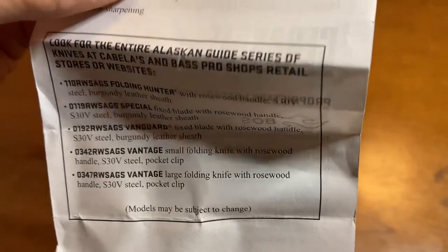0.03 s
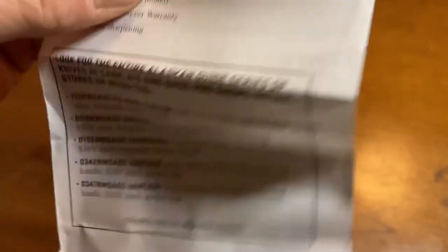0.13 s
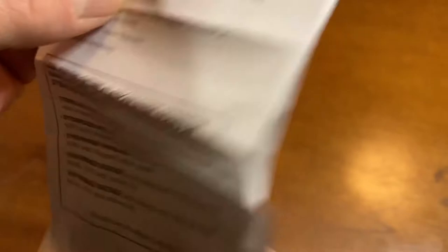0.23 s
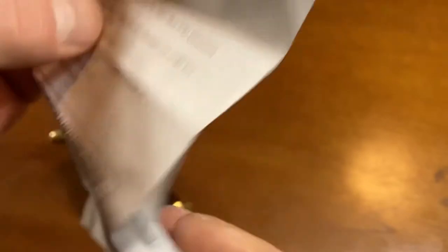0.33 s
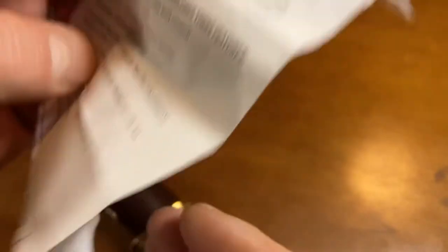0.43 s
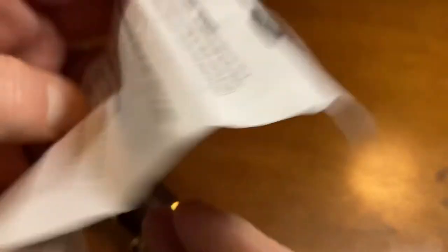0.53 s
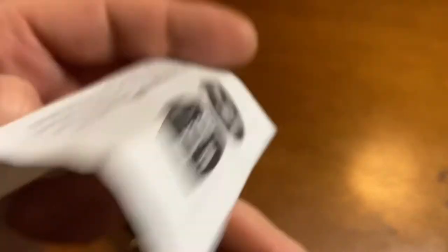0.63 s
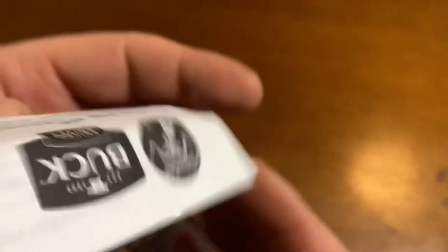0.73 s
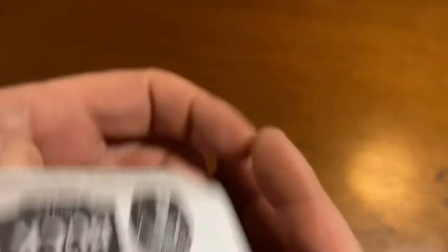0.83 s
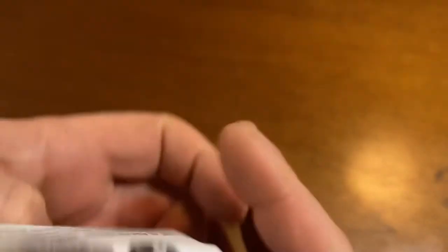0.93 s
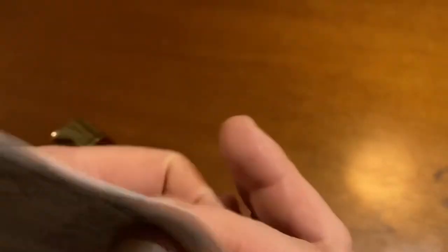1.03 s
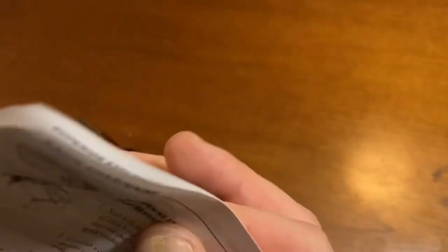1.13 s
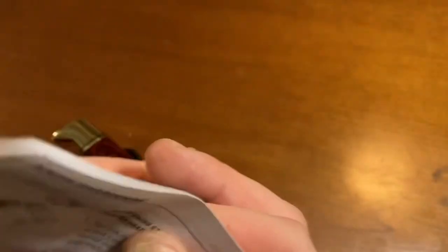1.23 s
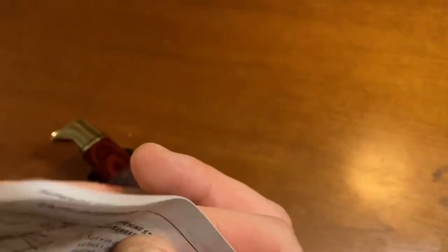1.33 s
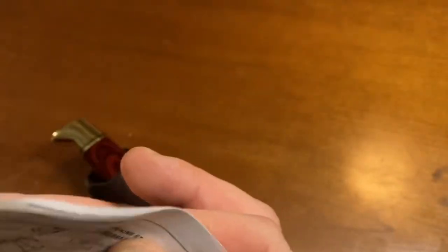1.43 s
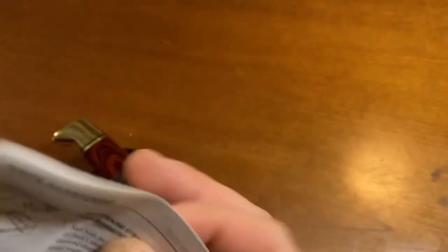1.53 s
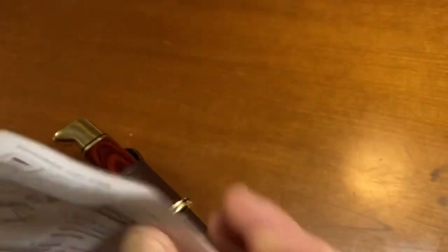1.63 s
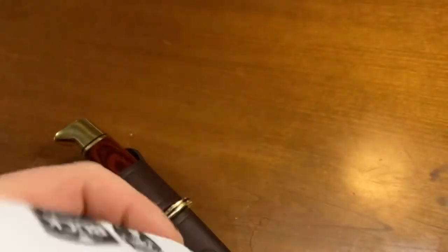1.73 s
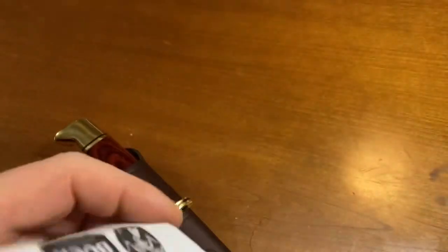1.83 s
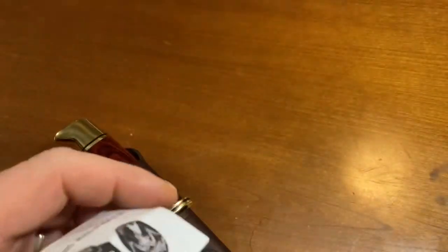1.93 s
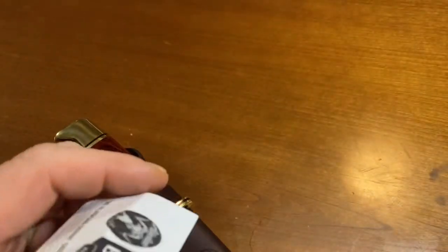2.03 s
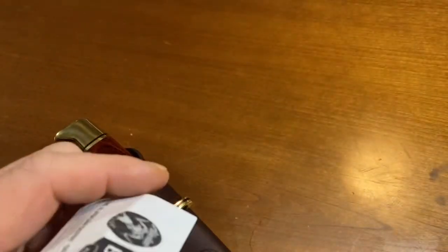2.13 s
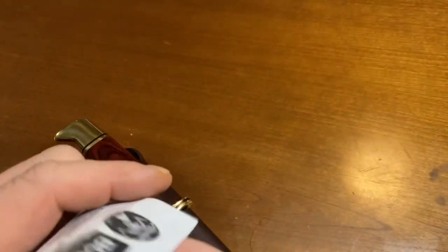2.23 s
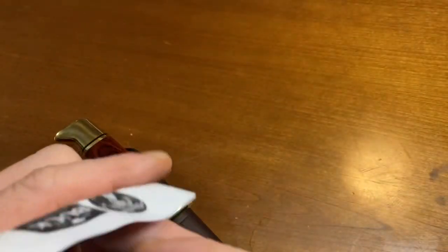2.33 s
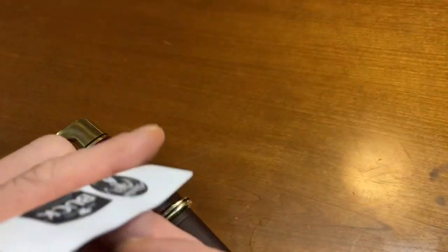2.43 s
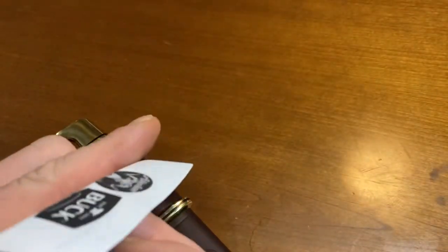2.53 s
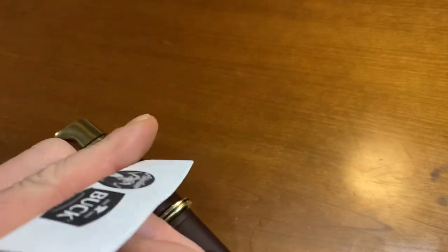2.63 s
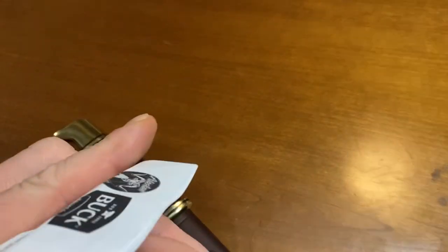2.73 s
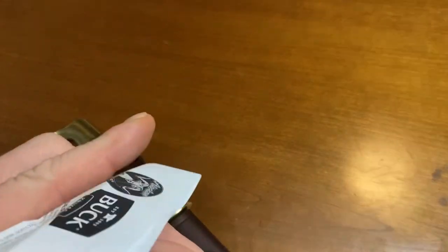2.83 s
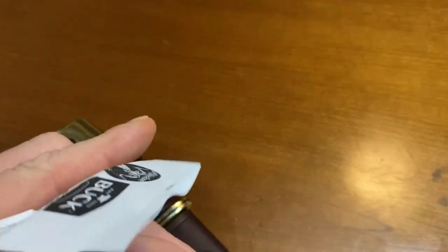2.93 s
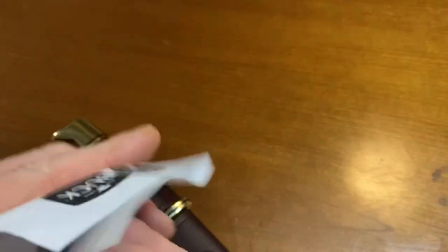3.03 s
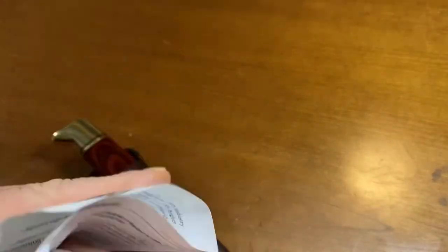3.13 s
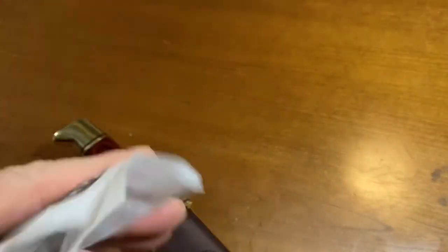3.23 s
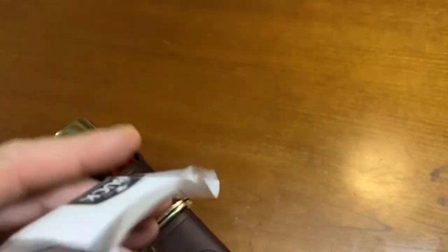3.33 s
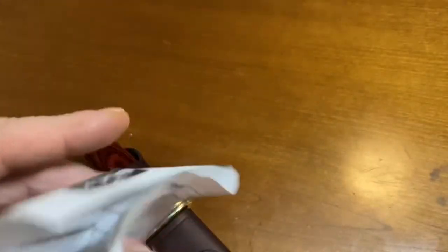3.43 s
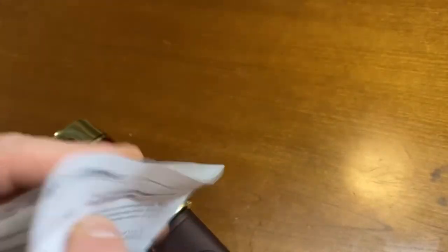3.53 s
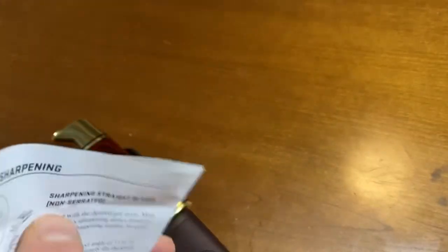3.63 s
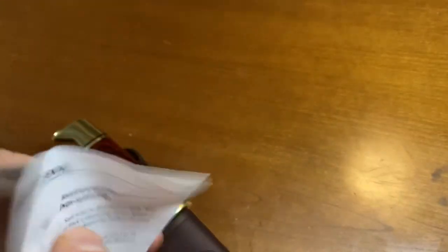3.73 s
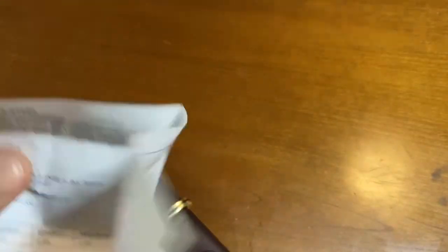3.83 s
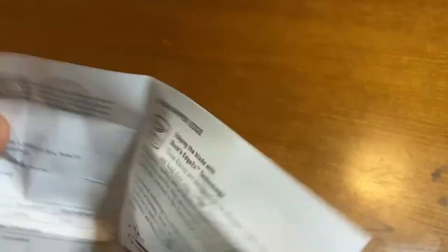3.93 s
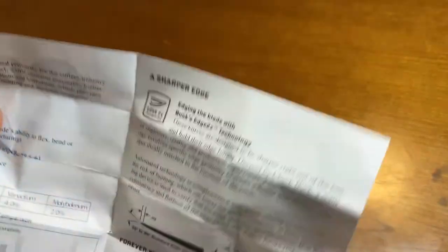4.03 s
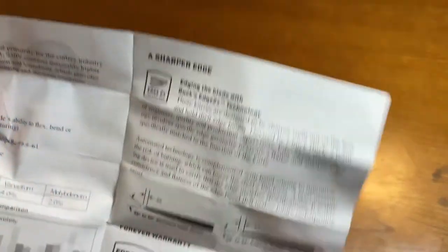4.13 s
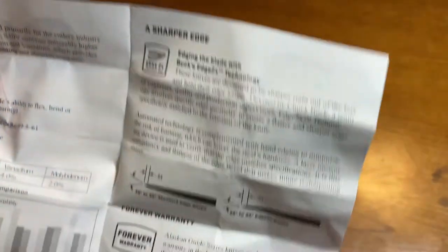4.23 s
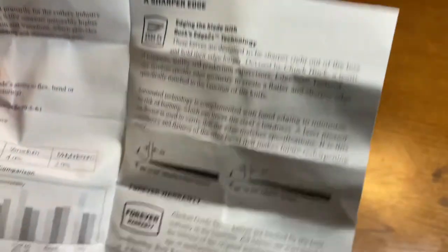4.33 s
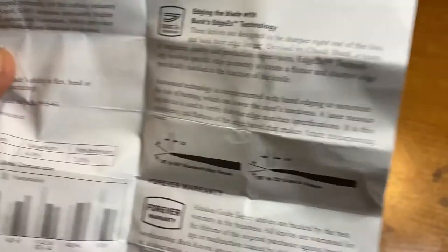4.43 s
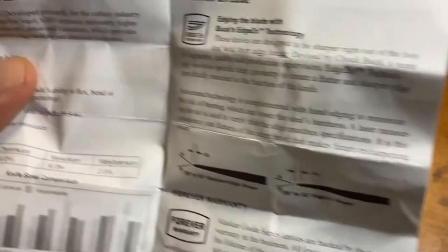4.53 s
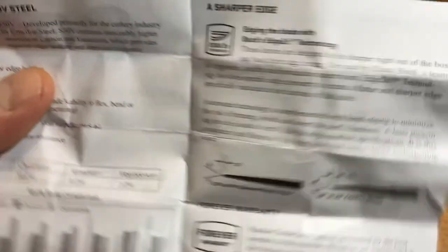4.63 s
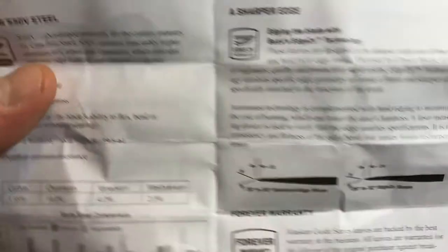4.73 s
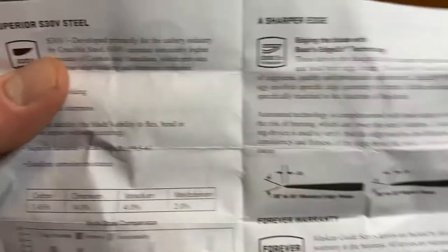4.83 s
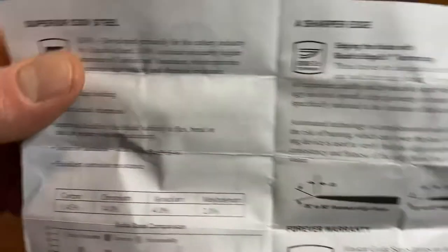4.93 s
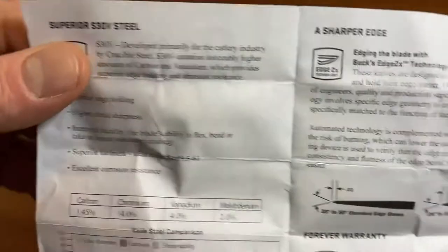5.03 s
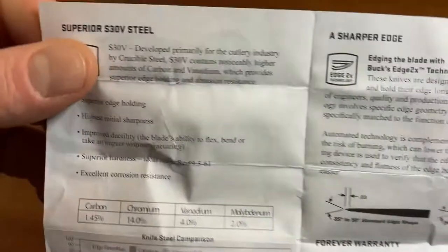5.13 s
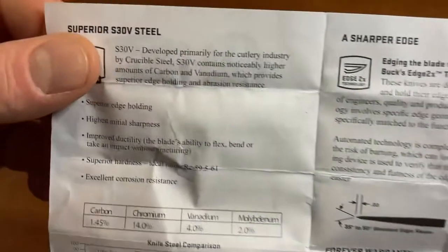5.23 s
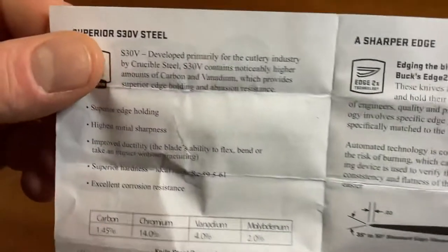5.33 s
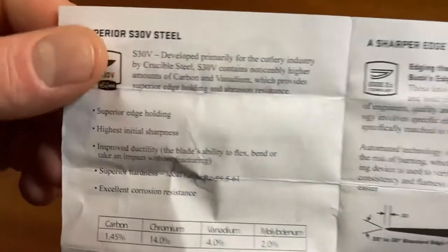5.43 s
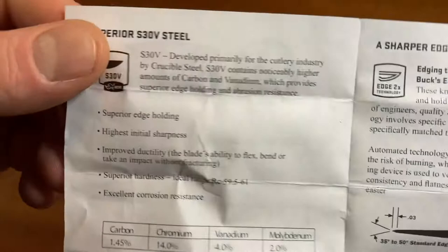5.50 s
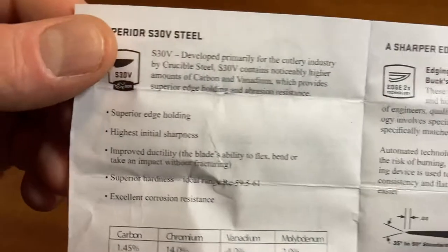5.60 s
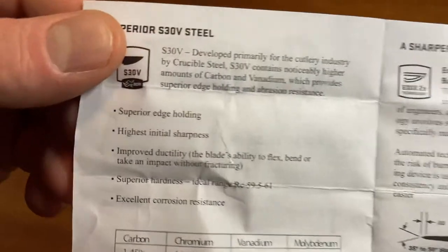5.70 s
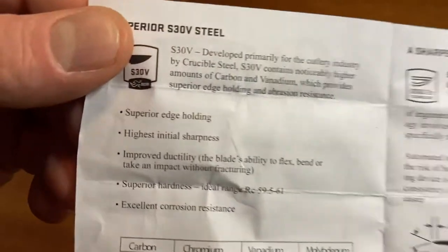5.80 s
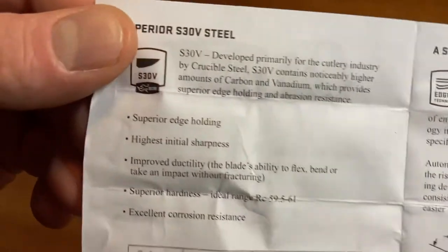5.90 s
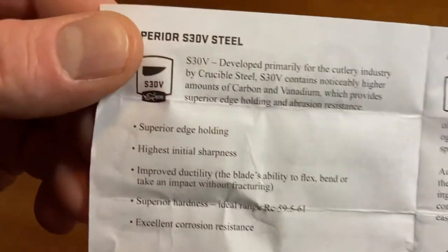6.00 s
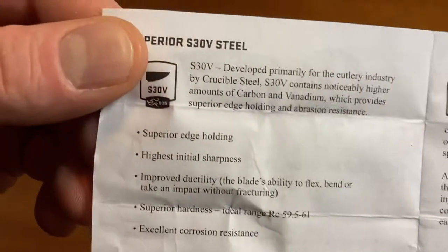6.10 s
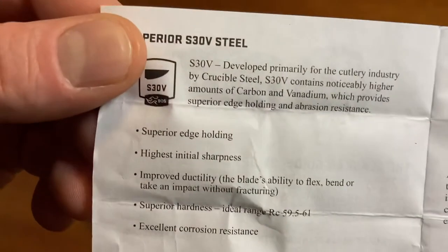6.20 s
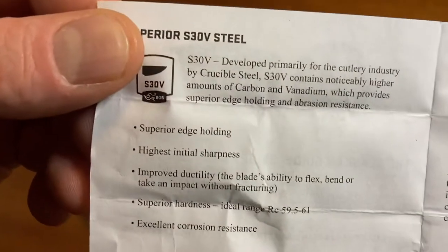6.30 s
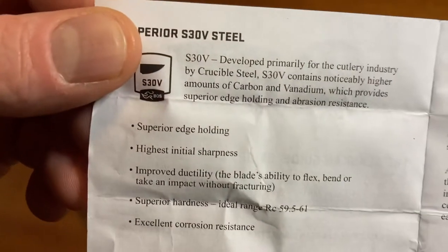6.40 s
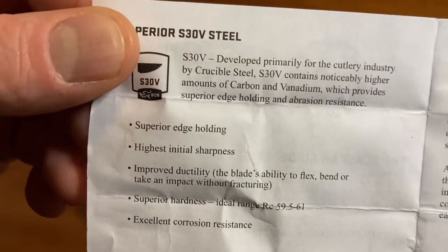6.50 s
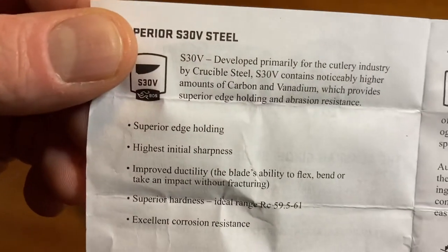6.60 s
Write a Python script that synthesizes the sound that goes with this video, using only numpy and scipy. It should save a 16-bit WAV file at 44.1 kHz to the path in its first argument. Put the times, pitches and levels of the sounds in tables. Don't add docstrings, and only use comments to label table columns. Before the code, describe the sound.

Close, dry crinkling of thin creased paper: light rustles, then a busy burst of crackles and snaps, fading into near silence.

```python
import sys
import numpy as np
from scipy import signal
from scipy.fft import rfft, irfft, dct, next_fast_len
from scipy.io import wavfile
from scipy.ndimage import uniform_filter1d, minimum_filter1d, map_coordinates

SR = 44100
rng = np.random.default_rng(int(sys.argv[2]) if len(sys.argv) > 2 else 0)


def gain_from_db(level_db):
    decades = np.asarray(level_db, float) / 20
    return 10 ** decades


def dump_mix(stems):
    frames = np.atleast_2d(stems).T
    limited = np.clip(frames, -1, 1)
    pcm = np.round(limited * 32767).astype(np.int16)
    wavfile.write(sys.argv[1], SR, pcm)


N = 293706

# frequency in Hz, density in dB per Hz.
ROOM_TONE_SPECTRUM = [(15, -39), (25, -18), (54, 3), (113, -0.5), (201, 2), (609, -16), (794, -26.5),
                      (1180, -15.5), (2350, -25), (2630, -25.5), (4380, -32), (5000, -52.5), (6500, -78.5),
                      (11000, -120)]
# frequency in Hz, density in dB per Hz.
SLIDE_SPECTRUM = [(2000, -8.5), (4000, -7), (6000, -7), (9000, 0), (12000, -6.5), (16000, -10.5)]
# frequency in Hz, density in dB per Hz.
CRACKLE_SPECTRUM = [(500, -30), (1000, -50.5), (1800, 5), (2500, 0), (3800, -1.5), (5500, 0), (9000, -9)]
# frequency in Hz, density in dB per Hz.
FLEX_SPECTRUM = [(150, -28), (300, -22), (550, -11.5), (900, -15.5), (1800, -42.5)]
# frequency in Hz, density in dB per Hz.
PUFF_SPECTRUM = [(25, -75), (50, 14), (100, 5.5), (200, 4), (400, -15.5)]
# frequency in Hz, time to fall 60 dB in seconds.
REVERB_TIME = [(200, 0.12), (1500, 0.25), (4000, 0.13), (12000, 0.0057)]
# frequency in Hz, likeness from 0 to 1.
PORT_COHERENCE = [(40, .96), (300, .93), (600, .8), (1000, .55), (1700, .75), (2600, .45), (4000, .8),
                  (6000, .96), (16000, .97)]
# frequency in Hz, lead of the left in radians.
PORT_PHASE = [(0, 0), (400, -.3), (900, -1.2), (1720, .3), (2580, 2.1), (3960, .9), (4800, 2.2),
              (5600, 3.14), (8500, 6.28), (11150, 9.0), (12550, 9.9), (14400, 12.35), (17000, 12.7)]
# frequency in Hz, left minus right in dB.
PORT_TILT = [(60, -.5), (400, 0), (700, 0), (1300, -4), (2400, -2.5), (4400, -1), (8000, 0)]

# top speed in seconds, level in dB, rise in s, fall in s.
STROKE_EVENTS = [(.15, -37.5, 0.14, 0.22), (.4, -51, 0.36, 0.52), (.59, -39.5, 0.25, 0.32),
                 (.95, -55, 0.17, .15), (1.13, -41.5, 0.26, 0.36), (1.51, -48, 0.051, 0.024),
                 (1.62, -52, 0.17, 0.12), (1.8, -53.5, 0.45, 0.26), (2.01, -48.5, 0.044, 0.12),
                 (2.22, -38.5, 0.044, 0.092), (2.45, -51.5, 0.15, 0.083), (2.66, -58.5, 0.13, 0.086),
                 (2.87, -38.5, 0.19, 0.26), (3.08, -35, 0.17, 0.45), (3.3, -35, 0.28, 0.21),
                 (3.5, -33, 0.14, 0.35), (3.7, -35, 0.15, 0.16), (3.99, -42.5, 0.14, 0.45),
                 (4.3, -48, 0.18, 0.54), (4.7, -35, 0.1, 0.28), (4.9, -40, 0.12, 0.44),
                 (5.12, -48, 0.1, 0.25), (5.43, -49, 0.21, 0.22), (5.68, -53, 0.062, 0.06),
                 (5.85, -60, 0.057, 0.27), (6.1, -55, 0.095, 0.28), (6.34, -49.5, 0.021, 0.038),
                 (6.42, -56, 0.018, 0.022), (6.535, -64.5, 0.014, 0.031), (6.655, -64, 0.037, .05)]
# time in seconds, peak in dB, treble in dB re peak, panel resonance in Hz.
CRACK_EVENTS = [(.032, -30.5, -8, 1310), (0.5412, -24.5, -15.5, 3830), (0.6923, -26.5, -4, 2240),
                (0.7671, -19, 8.5, 2220), (1.315, -15.5, 3.5, 1900), (1.6995, -39, -3, 2100),
                (1.7203, -35.5, -1.5, 2610), (2.0652, -33, -4, 3380), (2.1502, -52, 20, 4670),
                (2.2208, -33, 17.5, 1866), (2.376, -44.5, -0.5, 3180), (2.7287, -22, -0.5, 1660),
                (2.7849, -36, 5.5, 3650), (2.8789, -24, -3, 3700), (2.9217, -24.5, -4, 3830),
                (3.0721, -13.5, -1.5, 3390), (3.2191, -23.5, 1, 2025), (3.244, -33, 9, 1740),
                (3.3144, -17, 7, 1830), (3.515, -14, 3.5, 3220), (3.57, -20.5, 4.5, 2260),
                (3.602, -19.5, 1.5, 1830), (3.6124, -11, 2.5, 1880), (3.7181, -7, 5.5, 3980),
                (3.9465, -23.5, -8, 5160), (4.6, -14.5, 2.5, 2110), (4.686, -27, -15, 1410),
                (5.3752, -20.5, 4, 2010), (5.4585, -21, 5, 1720), (5.7357, -30, -8, 3260)]
# time in seconds, peak in dB, treble in dB re peak, panel resonance in Hz.
RIP_EVENTS = [(0.0683, -47.5, 9, 1200), (0.1355, -33, -26, 1360), (0.1911, -38, -22, 1330),
              (0.8876, -41, -3, 1430), (.985, -48.5, 5.5, 4000), (1.1344, -31, -1, 4400),
              (1.4281, -52.5, 3, 1340), (1.662, -33.5, -2, 2090), (1.904, -47, 2, 4050),
              (1.988, -44.5, 8.5, 1510), (2.206, -41.5, 1, 2070), (2.773, -33.5, -21, 3700),
              (3.0036, -33, -9, 1860), (3.038, -31, 0, 4020), (3.064, -20.5, 2, 1720),
              (3.143, -45, 7, 4180), (3.207, -24.5, 1, 2070), (3.262, -25.5, -3, 1760),
              (3.299, -43.5, 19, 4180), (3.4487, -31, 7, 3260), (3.554, -26, -10, 1980),
              (3.559, -29, 0, 1770), (3.802, -35, -1, 4260), (3.8308, -26.5, -8, 1690),
              (3.9227, -14, -0.5, 2020), (4.1662, -24, -7.5, 1500), (4.583, -47, 2, 1310),
              (4.615, -35, 9.5, 1890), (5.4638, -35, -5, 3000)]
# time in seconds, peak in dB, thud in dB re peak, length in ms.
BUCK_EVENTS = [(0.071, -48, 11, 3.9), (.135, -40, 1, 3.35), (0.2884, -39.5, -3, 8.8),
               (1.4966, -36.5, -6, 3.8), (3.315, -25.5, 1.5, 4.1), (3.822, -41, 6, 4.8),
               (4.0045, -36, -2, 7), (4.0459, -47, 8, 7.4), (4.1202, -27, -5.5, 11), (4.283, -31, -6.5, 7),
               (4.4329, -56.5, 12, 9.2), (4.593, -28, -9, 1.6), (4.6369, -27.5, -5.5, 4),
               (4.648, -24.5, -4, 4.6), (4.6618, -24.5, -3.5, 4.7), (4.6731, -22.5, -1, 4.9),
               (5.375, -34, 3, 2), (5.6169, -55, 9, 2.1), (5.824, -47.5, 9, 5), (5.8411, -43, 6.5, 3.9),
               (6.196, -59, 15, 8.3), (6.571, -55.5, 1.5, 5), (4.5815, -34.5, 2, 4.9)]
# hardest bend in seconds, level in dB, rise in s, fall in s.
BEND_EVENTS = [(.13, -54, 0.11, 0.28), (.62, -43, 0.39, 0.43), (1.12, -39.5, 0.31, .1),
               (1.33, -42.5, 0.16, 0.24), (1.7, -49.5, 0.32, 0.31), (2.01, -55.5, 0.1, 0.91),
               (2.29, -54, 0.075, 0.29), (2.44, -49.5, 0.16, 0.16), (2.84, -33, 0.13, 0.19),
               (3.08, -28.5, 0.09, 0.042), (3.3, -34.5, 0.57, 0.22), (3.51, -29, 0.1, 0.24),
               (3.78, -35.5, 0.95, 0.56), (3.94, -37, 0.24, 0.085), (4.18, -37, 0.14, 0.24),
               (4.675, -30, 0.096, 0.067), (4.605, -29, 0.026, 0.088), (4.98, -46, 0.14, 0.3),
               (5.39, -37, 0.044, 0.037), (5.46, -48.5, 0.096, 0.21), (5.75, -54, 0.11, 0.25),
               (6.1, -63, 0.44, 0.2), (6.5, -78, 0.2, 0.64)]
# time in seconds, peak in dB, panel resonance in Hz, length in ms.
POP_EVENTS = [(0.3007, -31.5, 1220, 3.2), (0.435, -33.5, 1820, 5.3), (.5544, -42.5, 2260, 8),
              (0.6015, -30.5, 1940, 3.4), (0.63, -27.5, 2330, 4.5), (0.7031, -27.5, 2000, 8.9),
              (0.936, -37, 2450, 5.2), (1.013, -34.5, 1800, 1.8), (1.3235, -46, 2560, 3.9),
              (1.3338, -46, 1830, 12), (1.3808, -14.5, 4420, 2.1), (1.5234, -37, 1990, 5.6),
              (2.8145, -31, 3700, 2.1), (2.8494, -23.5, 3800, 1.3), (2.8622, -28, 2450, 7.6),
              (3.845, -23, 1315, 8.6), (3.8904, -28.5, 1570, 5.5), (4.1762, -35, 1570, 10),
              (4.2319, -27.5, 1400, 8), (4.969, -30.5, 1290, 6.4), (5.3923, -28.5, 1370, 3.7),
              (4.6245, -27, 1500, 4), (4.744, -37, 1080, 5.8), (0.2882, -36.5, 1480, 3.6),
              (4.6004, -16, 1970, 4.7)]
# time in seconds, peak in dB, panel resonance in Hz, length in ms.
CRINKLE_EVENTS = [(0.556, -40, 3600, 3), (1.325, -37, 4400, 2.4), (1.658, -42, 3200, 3.2),
                  (2.766, -34, 3600, 6.9), (2.786, -35, 3520, 3.5), (2.797, -37, 3700, 5),
                  (2.827, -36, 1700, 2.3), (2.875, -33, 1300, 2.8), (2.906, -29, 1510, 3.7),
                  (3.004, -35, 4700, 1.7), (3.083, -32, 4200, 3), (3.094, -34, 3700, 3),
                  (3.308, -32, 1910, 4), (3.471, -34, 1710, 4.9), (3.497, -35, 3300, 2.7),
                  (3.504, -31, 1700, 3.3), (3.554, -26.5, 3200, 2.2), (3.561, -30, 3400, 2.4),
                  (3.623, -27, 3000, 5.3), (3.673, -29.5, 2500, 2.2), (3.698, -36, 3500, 3),
                  (3.713, -25, 1830, 4.3), (3.727, -25, 3660, 4.1), (3.806, -32, 3920, 3),
                  (3.831, -24, 3900, 2.8), (3.914, -32, 3100, 3), (3.892, -35, 4400, 3),
                  (4.087, -45, 1500, 2.7), (4.112, -33, 1410, 3.8), (4.127, -34, 4560, 2),
                  (4.155, -42, 1600, 2.6), (4.232, -29.5, 4260, 2.2), (4.376, -44, 1510, 3),
                  (4.608, -26, 2520, 2.2), (4.617, -34, 4000, 3), (4.625, -33, 3800, 2.6),
                  (4.65, -30, 3500, 3), (4.665, -29, 3800, 3), (4.675, -24, 3820, 5.5),
                  (4.688, -25, 2880, 2.6)]
# time in seconds, thud in dB, length in ms.
KNOCK_EVENTS = [(3.516, -30.5, 2.9), (4.1, -41, 3.8), (3, -32, 2.3), (5.459, -31, 2.4), (6.4, -39, 3.2),
                (4.6, -36, 2.5), (1, -50, 4.2), (5.617, -45, 2.5), (6.197, -48, 4)]
# time in seconds, peak in dB, pitch in Hz, cycles to fade.
FLAP_EVENTS = [(1.139, -38.5, 250, 1.2), (1.383, -36, 169, 1.1), (3.316, -34, 247, 1.2),
               (3.722, -30.5, 204, 1.5), (4.288, -33.5, 189, 1.3), (4.583, -33.5, 188, 1.5),
               (4.625, -35.5, 65, 1.2), (4.677, -27, 216, 2.1), (4.688, -31, 70, 1.3)]
# time in seconds, peak in dB.
TICK_EVENTS = [(2.8479, -49), (3.8212, -36), (4.568, -64), (4.581, -42), (5.9287, -59), (5.965, -56),
               (5.9794, -62)]
# top speed in seconds, level in dB, rise in s, fall in s.
SWING_EVENTS = [(3.05, -51, 0.18, 0.57), (3.33, -45, 0.11, 0.1), (3.47, -38, .06, .15),
                (3.73, -36, 0.029, 0.04), (3.87, -38, 0.15, 0.24), (4.16, -38.5, 0.29, 0.18),
                (4.29, -36, 0.029, 0.11), (4.69, -28.5, 0.12, 0.08), (4.97, -41, 0.029, 0.076)]


def unit(x):
    return x / np.sqrt(np.mean(x ** 2) + 1e-20)


def along(points, hz):
    f, v = np.transpose(points)
    return np.interp(np.log(hz + 1), np.log(f + 1), v, left=v[0])


def filtered(x, response):
    m = next_fast_len(x.shape[-1] + min(x.shape[-1], 4096))
    spectrum = rfft(x, m) * response(np.fft.rfftfreq(m, 1 / SR))
    return irfft(spectrum, m)[..., :x.shape[-1]]


def resonance(f, hz, width_hz):
    return 1j * f * width_hz / (hz * hz - f * f + 1j * f * width_hz)


def wobble(rate):
    knots = rng.standard_normal(int(N * 400 / SR) + 4)
    return map_coordinates(knots, [np.arange(N) * rate / SR])


def grains(spectrum, clump_db, spike_db):
    size = gain_from_db(clump_db * wobble(45) + spike_db * wobble(380))
    slips = size * rng.standard_normal((2, N))
    return unit(filtered(slips, lambda hz: gain_from_db(along(spectrum, hz))))


def curves(rows):
    s, db, rise_s, fall_s = np.transpose(rows)[:, :, None]
    t = np.arange(0, N + 64, 64) / SR
    away = np.where(t < s, (s - t) / np.abs(rise_s), (t - s) / np.abs(fall_s))
    power = np.sum(gain_from_db(2 * (db - 27.5 * away ** 1.28)), axis=0)
    return np.interp(np.arange(N) / SR, t, 10 * np.log10(power + 1e-12))


def room_tone():
    return gain_from_db(-55 + 2.5) * grains(ROOM_TONE_SPECTRUM, clump_db=1.0, spike_db=1.5)


def crinkles(count, spread_db):
    when, pitch, size, *phase = rng.random((5, count, 1))
    hz, t = 1300 * 3.6 ** pitch, np.arange(200) / SR
    decay = gain_from_db(-spread_db * np.log(size + .05)) * np.exp(-t * hz / 2.5)
    index = ((when * N).astype(int) + np.arange(len(t))).ravel()
    streams = []
    for p in phase:
        wavelets = decay * np.sin(2 * np.pi * (hz * t + p))
        streams.append(np.bincount(index, wavelets.ravel(), N + len(t))[:N])
    return unit(np.array(streams))


def patchy(x, depth_db):
    z = signal.stft(x, nperseg=256)[2]
    field = uniform_filter1d(rng.standard_normal(z.shape[1:]), size=5, axis=0)
    field = uniform_filter1d(field, size=24, axis=1)
    return unit(signal.istft(z * gain_from_db(depth_db * unit(field)), nperseg=256)[1][:, :N])


def hands():
    slide_db, bend_db = curves(STROKE_EVENTS), curves(BEND_EVENTS)
    slide = gain_from_db(slide_db - 2.1) * grains(SLIDE_SPECTRUM, clump_db=2.4, spike_db=0.6)
    fibres = grains(CRACKLE_SPECTRUM, clump_db=3, spike_db=3)
    crackle = patchy(fibres + gain_from_db(-3.5) * crinkles(count=3000, spread_db=4), depth_db=3)
    flexing = gain_from_db(-60.5) + gain_from_db(bend_db - 20) + gain_from_db(curves(SWING_EVENTS) - 13)
    flex = grains(FLEX_SPECTRUM, clump_db=1.5, spike_db=1)
    return slide + gain_from_db(bend_db - 4.0) * crackle + gain_from_db(-3.0) * flexing * flex


def creases():
    rows = []
    for s, db, treble_db, hz in CRACK_EVENTS:
        ms = 2.9 * np.exp(-.03 * (db + max(treble_db, 0) + 25.5))
        rows.append((s, db, -28, treble_db, hz, ms))
    for s, db, treble_db, hz in RIP_EVENTS:
        rows.append((s, db, -13.5, treble_db, hz, 7.6))
    for s, db, hz, ms in POP_EVENTS:
        thud_db = -14.5 - 6.5 * np.log2(hz / 2000)
        rows.append((s, db, thud_db, -25, hz, ms))
    for s, db, thud_db, ms in BUCK_EVENTS:
        rows.append((s, db, thud_db, -30, 1860, ms))
    for s, db in TICK_EVENTS:
        rows.append((s, db, -28, 7.5, 4000, 2.1))
    return rows


def small_creases():
    rows = [(s, db, -21.5, -9, hz, ms) for s, db, hz, ms in CRINKLE_EVENTS]
    return rows + [(s, db, -2.5, -30, 1860, ms) for s, db, ms in KNOCK_EVENTS]


def snaps(rows):
    out, t = np.zeros((2, N + SR)), np.arange(2048) / SR
    chance = rng.standard_normal((len(rows), 4, 2, len(t)))

    def at_peak_1(x):
        return x / np.sqrt(2 * uniform_filter1d(np.mean(x ** 2, axis=0), size=60).max())

    for (s, db, thud_db, treble_db, hz, ms), (a, b, c, rag) in zip(rows, chance):
        life = np.clip(ms, .5, 14) / 1000
        ragged = gain_from_db(5.0 * unit(uniform_filter1d(rag[0], size=30)))

        def burst(stretch):
            attack = (1 - np.exp(-t / (0.2 * life * stretch))) ** 2
            return ragged * attack * np.exp(-t / (0.72 * life * stretch))

        def panel_response(f):
            sharp = np.clip(.55 + treble_db / 40, .1, .6)
            return resonance(f, hz, .4 * hz) ** 2 + sharp * resonance(f, 2800, 4200) ** 2

        panel = filtered(a * burst(.95), panel_response)
        crack = filtered(b * burst(.6), lambda f: resonance(f, 8000, 8000) ** 2)
        thud = filtered(c * burst(1.27), lambda f: resonance(f, 510, 1150) ** 2)
        mix = gain_from_db(-0.8) * at_peak_1(panel) + gain_from_db(treble_db - 0.75) * at_peak_1(crack)
        mix = mix + gain_from_db(thud_db + 5.0) * at_peak_1(thud)
        out[:, round((s - .15 * life) * SR):][:, :len(t)] += gain_from_db(db) * mix
    return out[:, :N]


def room(x):
    out, step = np.zeros((2, N + SR)), SR // 4
    for start in range(0, N, step):
        hz, t, z = signal.stft(rng.standard_normal((2, SR // 3)), SR, nperseg=256)
        decay = gain_from_db(-60 * t / along(REVERB_TIME, hz)[:, None])
        tail = signal.istft(z * decay, SR, nperseg=256)[1]
        wet = signal.fftconvolve(x[None, start:start + step], tail / np.linalg.norm(tail[0]), axes=1)
        out[:, start + 120:][:, :wet.shape[1]] += wet
    return out[:, :N]


def flaps():
    out, t = np.zeros((2, N + SR)), np.arange(SR // 8) / SR
    for s, db, hz, cycles in FLAP_EVENTS:
        u = 2 * t * hz / np.clip(cycles, .3, 5)
        push = np.e * u * np.exp(-u) * np.sin(2 * np.pi * hz * t)
        out[0, round(s * SR):][:len(t)] += gain_from_db(db) * push
    return out[:, :N]


def fan():
    return gain_from_db(curves(SWING_EVENTS) - 3.8) * grains(PUFF_SPECTRUM, clump_db=2.5, spike_db=1.5)


def scene():
    folds = snaps(creases())
    echo = gain_from_db(-17) * room(folds[0])
    return room_tone() + hands() + folds + echo + snaps(small_creases()) + flaps() + fan()


def gated_treble(x, under_db, attack_db, quiet_db):
    pad, bump = 2048 - 147, np.kaiser(1025, 4 * np.pi)
    rise = np.sqrt(np.cumsum(bump[:-1]) / bump.sum())
    window, starts = np.concatenate([rise, rise[::-1]]), np.arange(0, N + pad, 1024)
    pair = np.pad([x[0] + x[1], x[0] - x[1]], ((0, 0), (pad, 2048)))
    a, b, c, d = np.split(pair[:, starts[:, None] + np.arange(2048)] * window, 4, axis=2)
    folded = np.concatenate([-c[..., ::-1] - d, a - b[..., ::-1]], axis=2)
    z = dct(folded, type=4, norm="ortho")
    edges = np.array([0, 196, 216, 240, 264, 292, *range(320, 737, 32)])
    band = np.digitize(np.arange(1024), edges) - 1
    power = np.add.reduceat(z ** 2, edges, axis=2) / np.bincount(band)
    budget_db = 3.5 * rng.standard_normal((len(starts), 1)) + 3 * rng.standard_normal(power.shape)
    limit = np.maximum(power[::-1] * gain_from_db(-2 * under_db), gain_from_db(2 * quiet_db)) * gain_from_db(budget_db)
    weak = (power < limit)[..., band] & (band > 0) | (band == band.max())
    quick = uniform_filter1d(np.diff(x[0], prepend=0) ** 2, size=128)
    crest = -minimum_filter1d(-quick, size=1200) / (uniform_filter1d(quick, size=2048) + 1e-14)
    calm = crest[np.clip(starts + 1024 - pad, 0, N - 1)] < gain_from_db(2 * attack_db)
    u, v = np.split(dct(z * ~(weak & calm[:, None]), type=4, norm="ortho"), 2, axis=2)
    frames = np.concatenate([v, -v[..., ::-1], -u[..., ::-1], -u], axis=2) * window
    overlapped = (frames[:, 1:, :1024] + frames[:, :-1, 1024:]).reshape(2, -1)
    total, difference = overlapped[:, pad - 1024:][:, :N]
    return np.array([total + difference, total - difference]) / 2


def roll_off(x):
    return signal.sosfilt(signal.butter(12, 16980, fs=SR, output="sos"), x)


def record(dry):
    def shares(hz):
        angle = np.arccos(np.clip(along(PORT_COHERENCE, hz), 0, 1)) / 2
        return np.array([np.cos(angle), np.sin(angle)])

    def port(hz):
        sign = np.array([[.5], [-.5]])
        phase = np.interp(hz, *np.transpose(PORT_PHASE))
        return gain_from_db(sign * along(PORT_TILT, hz)) * np.exp(1j * sign * phase)

    common, private = filtered(dry, shares)
    heard = filtered(np.array([common + private, common - private]), port)
    heard = heard / (1 + abs(heard / .7) ** 4) ** .25
    heard = filtered(heard, lambda hz: gain_from_db(-np.clip(hz - 15700, 0, None) / 40) * (hz < 16800))
    finished = gated_treble(heard, under_db=7.5, attack_db=9, quiet_db=-72)
    return roll_off(finished)


dry = scene()
out = record(dry)
dump_mix(out)
```